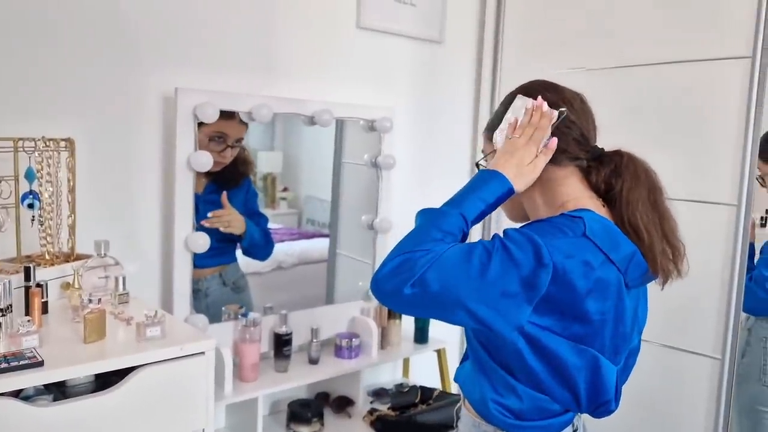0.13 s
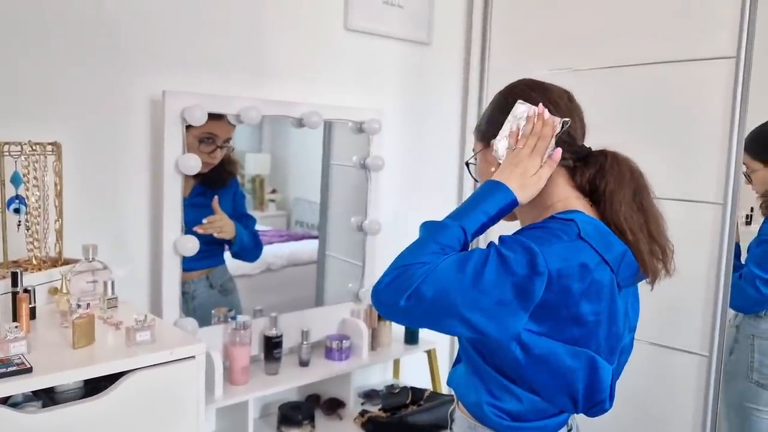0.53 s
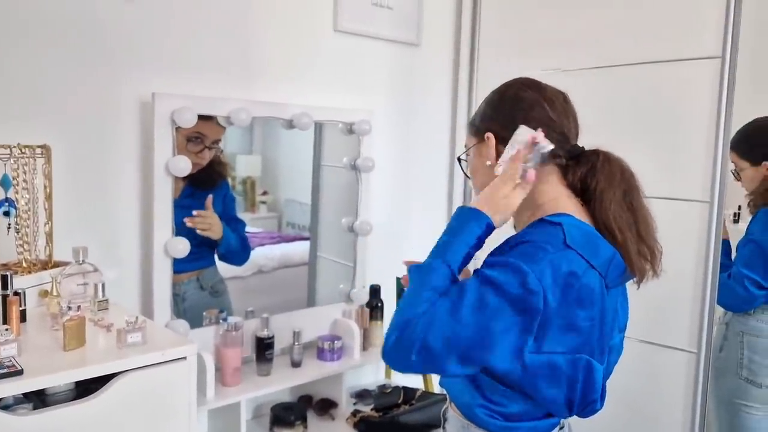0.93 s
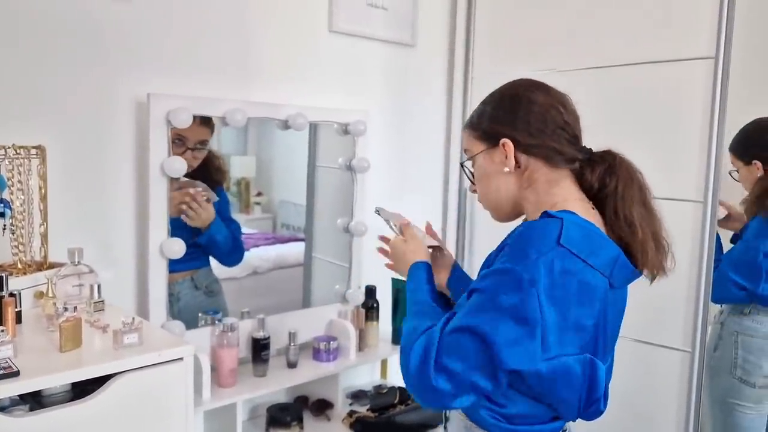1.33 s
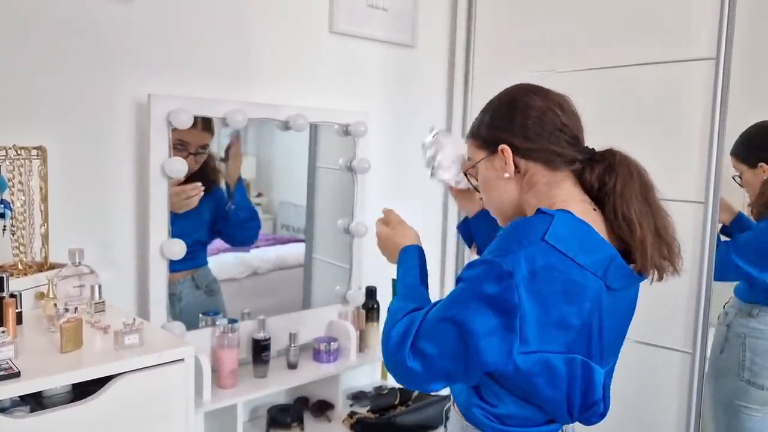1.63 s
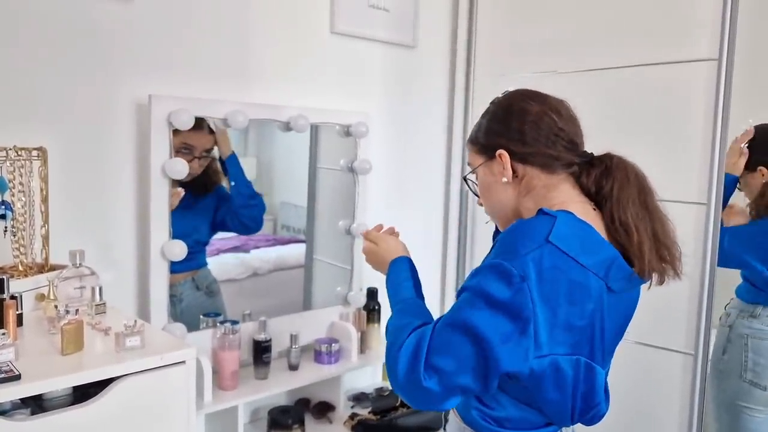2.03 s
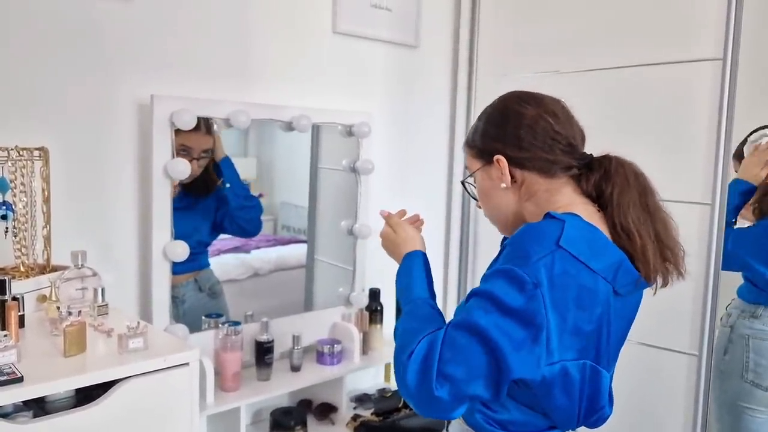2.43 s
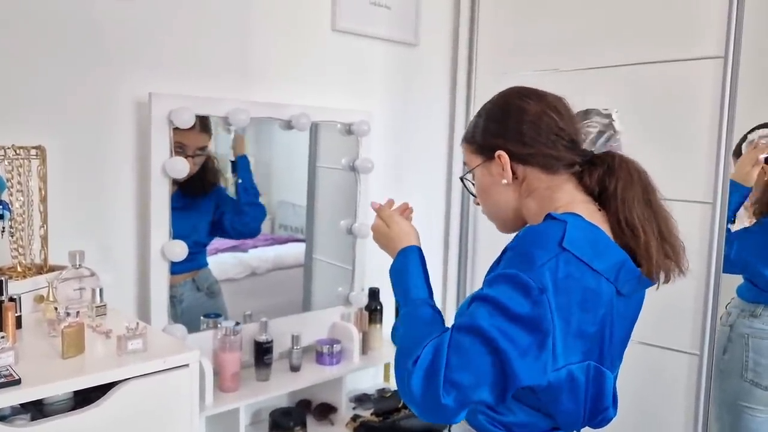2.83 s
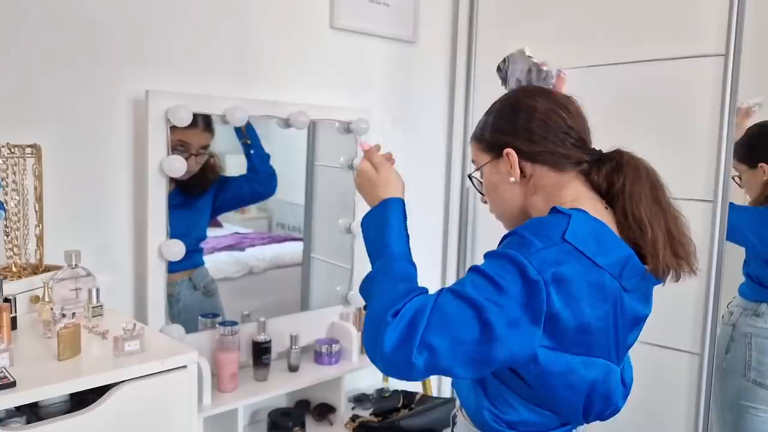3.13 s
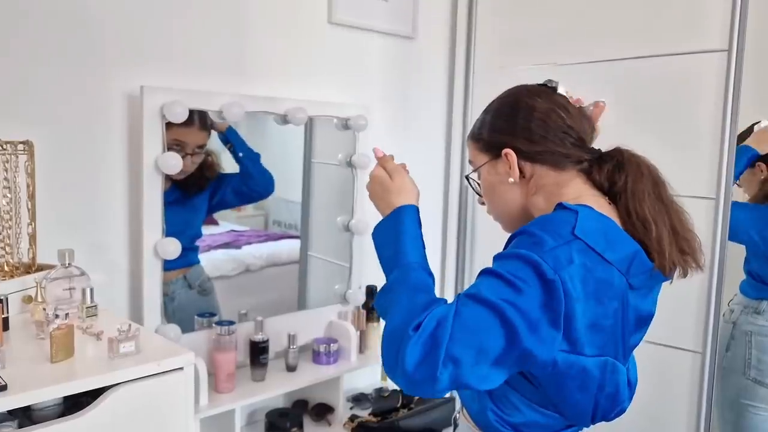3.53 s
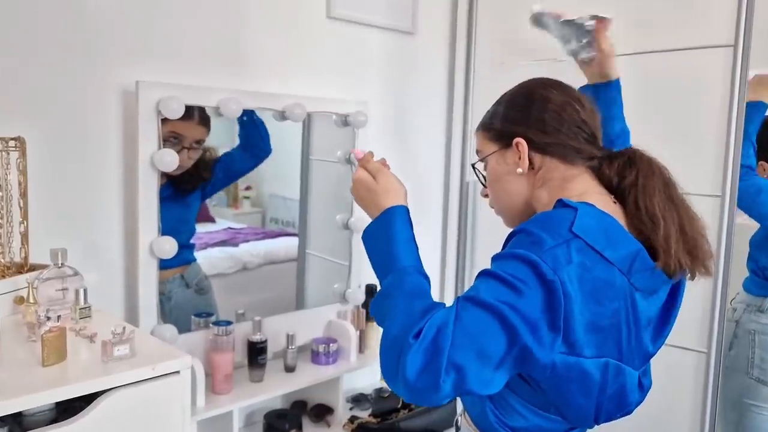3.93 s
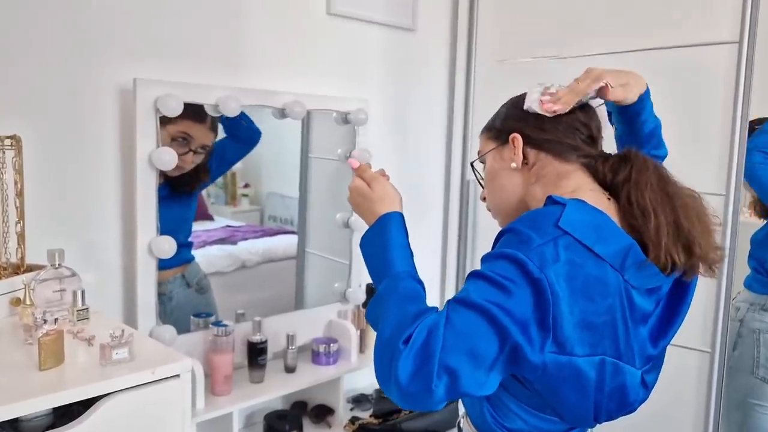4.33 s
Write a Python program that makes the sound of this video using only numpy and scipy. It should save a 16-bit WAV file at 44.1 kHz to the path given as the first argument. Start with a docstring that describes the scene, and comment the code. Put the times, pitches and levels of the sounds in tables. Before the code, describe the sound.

In a small furnished bedroom, a hand rubs and pats crinkled foil over hair. A low handling rumble and soft swishes come first with scattered dry snaps; the rustling grows crisper and louder from about 1.2 seconds, with a soft thump near 2.1, then lighter strokes and small crackles. Close stereo microphones, very faint room hush.

```python
"""A sheet of crinkled foil is rubbed and patted over hair in a small furnished bedroom, over a faint hush.
From the start, noise stirs the room's low modes (a rumble, strongest in the first second) and swishes follow
the hand: dense random creases, shaped by swells. Dry snaps (impulses) join from 0.17 s, buckling folds
(decaying sines) from 1.2 s, bright pops (sine and noise) from 1.4 s.
One soft thump, a sum of decaying sines, falls at 2.1 s."""
import sys
import numpy as np
from scipy import signal
from scipy.fft import rfft, irfft, next_fast_len
from scipy.io import wavfile
from scipy.ndimage import uniform_filter1d

SR = 44100
rng = np.random.default_rng(int(sys.argv[2]) if len(sys.argv) > 2 else 0)


def amplitude_ratio(level_db):
    """Convert a level in decibels to the matching linear amplitude (field) ratio."""
    exponent = np.asarray(level_db, float) / 20
    return 10 ** exponent


def output_pcm(signal):
    """Save a mono or channel-first signal as 16-bit PCM at the path in sys.argv[1].

    Samples are clipped to [-1, 1] before scaling.
    """
    pcm = np.clip(np.atleast_2d(signal).T, -1, 1) * 32767
    wavfile.write(sys.argv[1], SR, np.round(pcm).astype(np.int16))


N = 197391  # samples

# hush of the room: (frequency [Hz], relative level per Hz [dB])
HUSH_COLOUR = [(59, -29), (100, 20.5), (287, 6), (370, 5), (627, -0.5), (1620, -19), (2630, -47),
               (3770, 2.5), (7410, -1.5), (15500, -26)]
HUSH_DB = -72.5
# left-right likeness: (frequency [Hz], likeness [0..1])
EAR_LIKENESS = [(60, .9), (300, .75), (600, .55), (1000, .2), (1600, .06), (15000, .01)]

# rumble through the floor: (time [s], low, middle, upper mode group level [dB])
RUMBLE_LEVELS = [(0.0, -64, -67, -91), (0.14, -69, -84, -73), (0.18, -55, -45, -50.5),
                 (0.22, -49, -46.5, -46.5), (0.31, -45, -44, -56.5), (0.37, -45, -48, -68),
                 (0.42, -57, -55, -71.5), (0.59, -51.5, -57.5, -54), (0.64, -50.5, -61.5, -61),
                 (0.74, -60, -50, -73.5), (0.82, -54.5, -71, -75), (0.95, -76, -76, -93),
                 (1.05, -90, -94, -100)]
# room modes, one list a group: (frequency [Hz], nominal width [Hz], relative level [dB])
ROOM_MODES = [
    [(45.6, 22, 4), (72, 15, -23)],
    [(113.9, 8.7, 1.5), (137, 20, -7)],
    [(185.4, 11.5, 2.5), (231, 74, -12), (376, 40, -20)],
]
# faint stirs of the modes: (peak time [s], half width [s], low, middle, upper group level [dB])
MODE_STIRS = [(1.19, 0.026, -67, -73, -71), (1.28, 0.022, -68, -64, -90), (1.74, 0.045, -82, -56.5, -64),
              (1.81, 0.037, -60, -67, -73.5), (2.73, 0.067, -71, -76, -90), (3.38, 0.13, -67, -75.5, -80),
              (3.5, 0.11, -68, -72.5, -71), (4.46, .05, -66, -73, -86)]
# modes at rest, one value a group: (level [dB])
MODE_REST_DB = [-78, -85.5, -107]

# swishes of the hand: (peak time [s], fizz level [dB], rise [s], fall [s], body level re fizz [dB])
SWISHES = [(.025, -45, 0.055, 0.19, -17), (.27, -42.5, 0.089, 0.15, -10.5), (.42, -48, 0.046, 0.018, -14),
           (.55, -41, .07, 0.14, -13.5), (.81, -44, 0.071, 0.088, -16.5), (.88, -48.5, 0.038, 0.056, -8.5),
           (.965, -46, .025, 0.24, -16), (1.09, -46, .15, .1, -14), (1.183, -36, 0.067, 0.11, -11.5),
           (1.365, -44.5, 0.017, 0.066, -16.5), (1.472, -43.5, .025, 0.087, -20),
           (1.56, -34, .06, 0.16, -17), (1.675, -33, 0.038, .15, -9.5), (1.81, -39.5, 0.089, 0.038, -13.5),
           (1.96, -42, 0.093, 0.055, -17.5), (2.11, -29, 0.046, 0.1, -10.5),
           (2.31, -35.5, 0.14, 0.2, -13.5), (2.549, -36.5, 0.054, 0.085, -14.5),
           (2.7, -36, 0.23, 0.18, -14.5), (2.93, -38, .2, 0.15, -14), (3.09, -42, 0.17, 0.043, -19.5),
           (3.189, -52, .025, 0.058, -17.5), (3.291, -46, 0.011, 0.068, -20),
           (3.39, -46.5, 0.034, 0.081, -10), (3.475, -51.5, 0.037, 0.089, -27),
           (3.521, -36.5, 0.016, 0.093, -13), (3.709, -40.5, 0.19, 0.18, -17),
           (3.94, -37, 0.071, 0.12, -13.5), (4.05, -42.5, 0.09, 0.079, -9.5), (4.135, -52, .03, 0.036, -3),
           (4.27, -47.5, 0.24, 0.11, -19.5), (4.39, -38.5, 0.08, 0.079, -13.5),
           (4.448, -39, 0.055, 0.056, -6.5)]
SWELL_DROP_DB = 10  # lost over the rise or fall time at steep = 1
SWELL_CURVATURE, BODY_STEEP = 1.54, 1.3  # the body swells more steeply than the fizz
# colour of fine creases: (frequency [Hz], relative level per Hz [dB])
FIZZ_COLOUR = [(1590, -29), (2700, -3.5), (4810, -3), (5450, -1), (10000, -4), (14800, -4.5), (15500, -5.5)]
# colour of broad folds: (frequency [Hz], relative level per Hz [dB])
BODY_COLOUR = [(260, -26), (450, -19), (520, -58), (660, -7), (1000, -11), (1400, -2), (1900, 0.5),
               (2600, 0), (3500, -2), (5900, -85)]
# treble of the fizz, taken relative to its mean: (time [s], level [dB])
AIR_LEVELS = [(0, -6), (1.0, -5.5), (1.4, -2.5), (2.0, -4), (2.4, -5.5), (3.0, -3), (3.3, -4), (4.47, -1.5)]

# dry single snaps: (time [s], level before mixing [dB])
SNAPS = [(0.166, -32), (0.2267, -39), (0.2487, -24.5), (0.419, -27.5), (0.5362, -22), (0.5441, -19),
         (0.551, -30), (0.5622, -23), (0.5794, -29), (0.615, -28), (0.81, -23), (0.8782, -25.5),
         (0.9598, -28), (0.992, -24.5), (1.0674, -24.5), (1.193, -31), (1.2224, -42), (1.3606, -34),
         (1.4494, -30), (3.377, -39), (3.855, -28), (4.065, -31), (4.128, -31)]
# colour of a snap: (frequency [Hz], relative level per Hz [dB])
SNAP_COLOUR = [(700, -33), (1500, -11), (3000, -1), (6000, -3), (11000, -10), (15500, -7.5)]
# broad folds that buckle and ring: (time [s], level before mixing [dB], pitch [Hz], t60 [s])
BUCKLES = [(1.185, -40, 1940, 0.11), (1.559, -55, 660, 0.34), (1.66, -51, 788, 0.29),
           (1.665, -55.5, 425, 0.21), (1.74, -53, 245, .12), (2.09, -52, 480, 0.087), (2.095, -48, 946, .1),
           (1.715, -52, 667, 0.28), (2.175, -44.5, 760, 0.076), (2.662, -47, 960, 0.075),
           (2.701, -43.5, 1370, 0.11), (2.964, -53.5, 810, 0.2), (3.512, -50.5, 710, 0.081),
           (3.515, -40, 2034, 0.11), (3.945, -57.5, 645, 0.16), (4.012, -48.5, 810, 0.14),
           (4.125, -48.5, 1980, 0.099), (4.42, -48, 1480, 0.17)]
# single creases that pop out: (time [s], level before colouring [dB], pitch [Hz])
POPS = [(1.3591, -38.5, 5070), (1.448, -49, 5670), (1.4662, -33.5, 8320), (2.0584, -39, 5580),
        (3.1786, -45.5, 9700), (3.264, -47.5, 7470), (3.2865, -38, 10300), (3.3752, -42, 2800),
        (3.5127, -30.5, 9900), (4.0605, -36.5, 7070), (4.13, -43, 1970)]

# partials of the thump: (frequency [Hz], relative level [dB], t60 [s])
THUMP_PARTIALS = [(149, 7, 0.076), (118, -16, 0.17), (193, -7, 0.15), (252, -9, 0.135), (319, -11, 0.138),
                  (676, -8.5, 0.065)]
THUMP_S, THUMP_DB = 2.087, -32


def evened(x):
    """Scales to rms 1."""
    return x / np.sqrt(np.mean(x ** 2) + 1e-20)


def read(points, hz):
    """Reads a table on a log-frequency axis."""
    f, value = np.transpose(points)
    return np.interp(np.log(hz + 1), np.log(f + 1), value)


def curves(rows):
    """Each column of a table, one value a sample."""
    s, *columns = np.transpose(rows)
    return [np.interp(np.arange(N) / SR, s, column) for column in columns]


def swells(rows, steep=1.0):
    """Gain of overlapping swells (peak s, dB, rise s, fall s), added as power."""
    t = np.arange(0, N + 64, 64) / SR
    power = 1e-14
    for s, db, rise, fall in rows:
        away = np.where(t < s, (s - t) / rise, (t - s) / fall)
        power = power + amplitude_ratio(db - steep * SWELL_DROP_DB * away ** SWELL_CURVATURE) ** 2
    return np.interp(np.arange(N) / SR, t, np.sqrt(power))


def coloured(x, points):
    """Filters by a spectrum, keeping the power of white input."""
    size = next_fast_len(N)
    shape = evened(amplitude_ratio(read(points, np.fft.rfftfreq(size, 1 / SR))))
    return irfft(rfft(x, size) * shape, size)[..., :N]


def pair(x):
    """Makes the right channel resemble the left in the bass, as two close microphones do."""
    size = next_fast_len(N)
    same = np.clip(read(EAR_LIKENESS, np.fft.rfftfreq(size, 1 / SR)), 0, 1)
    left, other = rfft(x, size)
    right = same * left + np.sqrt(1 - same ** 2) * other
    return irfft(np.array([left, right]), size)[:, :N]


def highpassed(x, order, cutoff_hz):
    """Butterworth high-pass."""
    return signal.sosfilt(signal.butter(order, cutoff_hz, "high", fs=SR, output="sos"), x)


def hush():
    """Steady coloured noise, alike in both ears only in the bass."""
    return amplitude_ratio(HUSH_DB) * pair(coloured(rng.standard_normal((2, N)), HUSH_COLOUR))


def resonate(x, hz, width_hz):
    """A resonance of gain 1: a one-pole low-pass shifted up to hz."""
    turn = np.exp(2j * np.pi * hz * np.arange(N) / SR)
    r = np.exp(-np.pi * width_hz / SR)
    return 2 * (turn * signal.lfilter([1 - r], [1, -r], x / turn)).real


def stirred_mode(hz, width_hz):
    """White noise through two equal resonances in series, for steep flanks."""
    once = resonate(rng.standard_normal(N), hz, width_hz)
    return evened(resonate(once, hz, width_hz))


def ring(modes):
    """A group of stirred modes, its beating partly evened out."""
    # each resonance is wider than nominal, since two in series narrow the band
    tone = evened(sum(amplitude_ratio(db) * stirred_mode(hz, 1.42 * width) for hz, width, db in modes))
    beat_power = uniform_filter1d(uniform_filter1d(tone ** 2, 900), 900)
    return evened(tone / (abs(beat_power) + 0.05) ** 0.27)


def rumble():
    """Noise stirs the low modes of the room; the higher the mode, the more it differs between the ears."""
    both = np.zeros((2, N))
    opposite = np.array([[1], [-1]])
    side_dbs = (-23, -21, -11)
    for k, (db, modes, side_db) in enumerate(zip(curves(RUMBLE_LEVELS), ROOM_MODES, side_dbs)):
        stirs = swells([(s, dbs[k], width, width) for s, width, *dbs in MODE_STIRS])
        level = np.sqrt(amplitude_ratio(db) ** 2 + stirs ** 2 + amplitude_ratio(MODE_REST_DB[k]) ** 2)
        both += level * (ring(modes) + amplitude_ratio(side_db) * opposite * ring(modes))
    return highpassed(both, 4, 36)


def creases(per_s, spread_db, clump_db):
    """Random snaps, most small and a few large, coming in clumps of some milliseconds; rms 1."""
    size = amplitude_ratio(spread_db * np.minimum(rng.exponential(1, N), 5)) * rng.choice([-1.0, 1.0], N)
    clumps = evened(uniform_filter1d(uniform_filter1d(rng.standard_normal(N), 300), 300))
    happens = rng.random(N) < per_s / SR
    return evened(size * happens * amplitude_ratio(clump_db * clumps))


def swishes(fizz_gain):
    """Fine creases give the fizz, broader folds the body; both swell with each stroke."""
    body_rows = [(s, db + body_db, rise, fall) for s, db, rise, fall, body_db in SWISHES]
    body_gain = swells(body_rows, BODY_STEEP)
    fine = coloured(creases(per_s=10000, spread_db=1, clump_db=0.68), FIZZ_COLOUR)
    air_db, = curves(AIR_LEVELS)
    fine += (amplitude_ratio(air_db - air_db.mean()) - 1) * highpassed(fine, 2, 9000)
    folds = coloured(creases(per_s=3000, spread_db=1.5, clump_db=1.5), BODY_COLOUR)
    return fizz_gain * fine + body_gain * folds


def snaps(fizz_gain):
    """Single creases give way as impulses; smaller ones scatter along the strokes."""
    out = np.zeros(N)
    for s, db in SNAPS:
        out[round((s + 0.0012) * SR)] = amplitude_ratio(db)  # each snap sounds 1.2 ms after its table time
    out += fizz_gain * amplitude_ratio(-20) * creases(per_s=60, spread_db=2.5, clump_db=1.0)
    return coloured(out, SNAP_COLOUR)


def add_at(out, s, burst):
    """Adds a burst at s seconds, cut at the end of the sound."""
    part = out[round(s * SR):][:len(burst)]
    part += burst[:len(part)]


def buckles():
    """Broad folds buckle and ring as short dull tones: sines with a soft onset and exponential decay."""
    t, out = np.arange(SR // 8) / SR, np.zeros(N)
    for s, db, hz, t60 in BUCKLES:
        tone = np.sin(2 * np.pi * hz * t) * (1 - np.exp(-t / 0.0027))
        add_at(out, s, tone * amplitude_ratio(db - 60 * t / t60))
    return out


def pops():
    """Creases pop out as short bright bursts: a sine in noise, with a quick onset and decay."""
    t, out = np.arange(SR // 8) / SR, np.zeros(N)
    onset = 1 - np.exp(-t / 0.00045)
    for s, db, hz in POPS:
        burst = (0.4 * np.sin(2 * np.pi * hz * t) + 0.79 * rng.standard_normal(len(t))) * onset
        add_at(out, s, burst * amplitude_ratio(db - 60 * t / 0.089))
    return coloured(out, FIZZ_COLOUR)


def reflections(x):
    """The sheet's brief rattle, then the walls; the pattern differs per ear and per spot on the moving sheet."""
    rattle_t60_s, walls_t60_s, walls_delay_s, walls_db = 0.016, 0.074, 0.004, -4
    spots, spot_samples = 10, 130
    t = np.arange(SR // 4) / SR
    length = next_fast_len(N + SR // 4)
    rattle, walls = rng.standard_normal((2, spots, 2, len(t)))
    rattle = rattle * amplitude_ratio(-60 * t / rattle_t60_s)
    walls = walls * amplitude_ratio(-60 * t / walls_t60_s) * (t > walls_delay_s)
    taps = evened(evened(rattle) + amplitude_ratio(walls_db) * evened(walls)) / np.sqrt(len(t))
    # hop between spots at random, crossfading
    spot = np.repeat(rng.integers(0, spots, N // spot_samples + 1), spot_samples)[:N]
    chosen = 1.0 * (spot == np.arange(spots)[:, None])
    share = np.sin(np.pi / 2 * uniform_filter1d(chosen, spot_samples))  # squares sum to 1
    spectra = rfft(share * x, length)[:, None] * rfft(taps, length)
    return irfft(spectra.sum(0), length)[:, :N]


def foil():
    """All foil sounds are reflected; single folds and snaps are also heard directly."""
    fizz_gain = swells([row[:4] for row in SWISHES])
    single = snaps(fizz_gain) + 0.5 * buckles()
    sound = swishes(fizz_gain) + pops() + 0.51 * single
    sheet = pair(reflections(sound)) + 1.34 * single
    treble = highpassed(sheet, 2, 7000)
    return sheet + (amplitude_ratio([[-0.7], [0.7]]) - 1) * treble  # the treble leans to the right


def thump():
    """A soft blow, rising over a few milliseconds: decaying sines."""
    t = np.maximum(np.arange(N) / SR - THUMP_S, 0)
    tones = sum(amplitude_ratio(db - 60 * t / t60) * np.sin(2 * np.pi * hz * t) for hz, db, t60 in THUMP_PARTIALS)
    return amplitude_ratio(THUMP_DB) * (1 - np.exp(-t / 0.0053)) ** 2 * tones


def scene():
    """The hush of the room, rumble, foil and thump."""
    return hush() + rumble() + foil() + thump()


def low_pass(x):
    """Removes everything above the highest recorded frequency."""
    return signal.sosfilt(signal.butter(12, 16800, fs=SR, output="sos"), x)


def record(dry):
    """Band-limits the mix with a steep linear-phase low-pass at 15.7 kHz."""
    edge = signal.firwin(511, 15700, window=("kaiser", 9), fs=SR)
    mix = signal.oaconvolve(dry, edge[None], "same")
    return low_pass(mix)


dry = scene()
out = record(dry)
output_pcm(out)
```